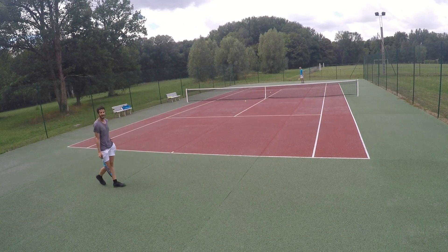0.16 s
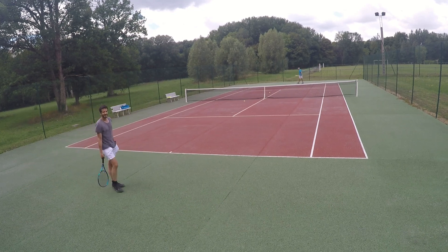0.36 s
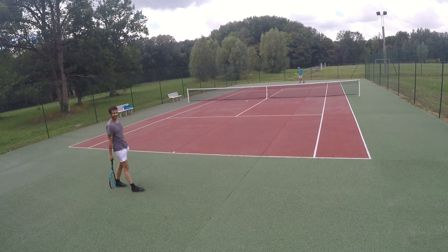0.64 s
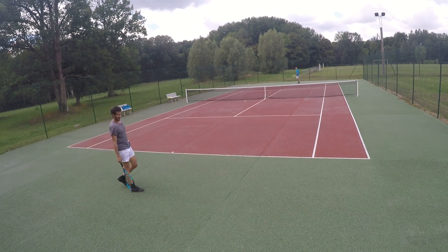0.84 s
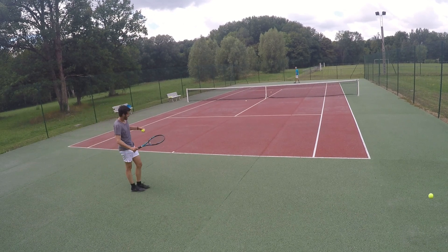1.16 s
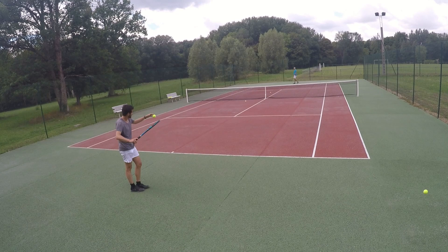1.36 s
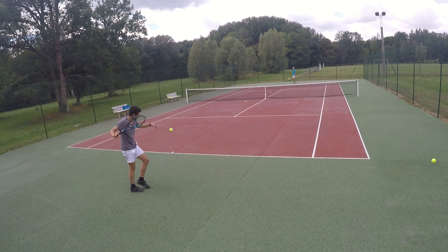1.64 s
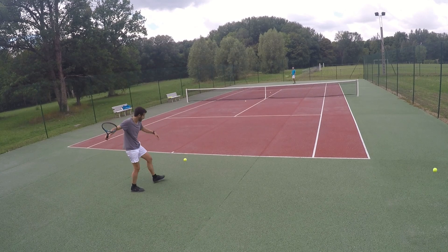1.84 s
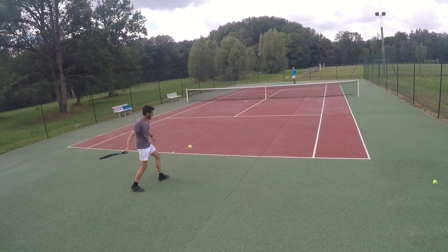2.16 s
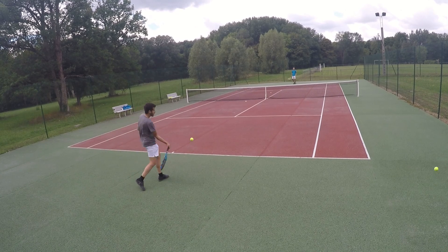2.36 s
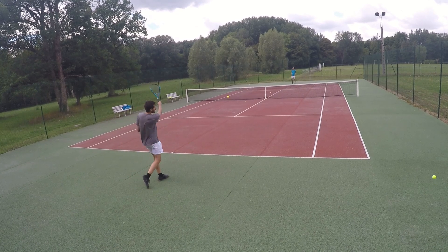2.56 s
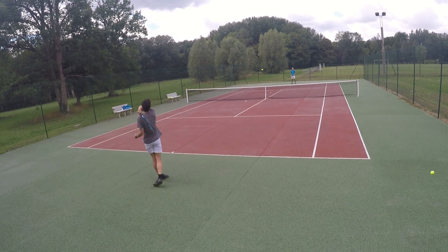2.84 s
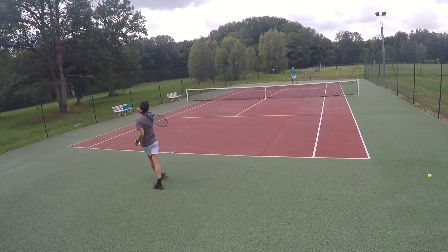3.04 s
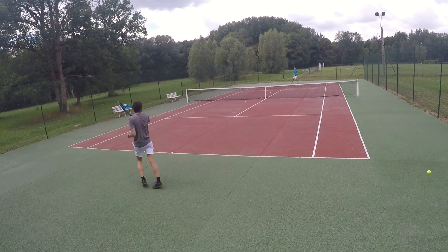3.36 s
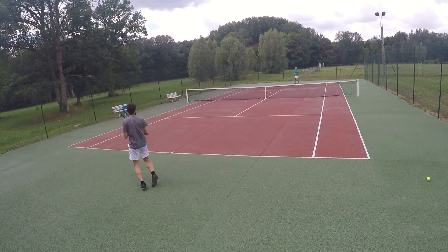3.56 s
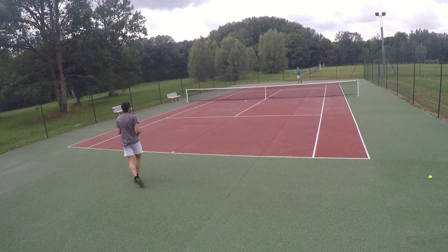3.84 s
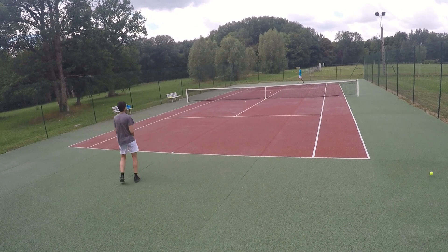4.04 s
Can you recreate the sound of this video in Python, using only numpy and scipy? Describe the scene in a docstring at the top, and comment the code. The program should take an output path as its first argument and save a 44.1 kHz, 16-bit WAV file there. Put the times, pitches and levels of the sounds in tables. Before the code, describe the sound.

Outdoors on a tennis court, a faint hiss and a short rough hum of stretching wire lead into a loud, clipped crash as a ball hits the chain-link fence holding the microphone. The mesh slaps the housing in quick, thinning knocks, links jingle and tick, and the panel sways in a deep rumble that fades away.

```python
"""On an outdoor court, a ball bangs into a chain-link fence right beside a camera that hangs on it.
The wires scuff and hum as the mesh stretches, then noise bursts make the crash, which overloads the microphone.
The mesh slaps the camera's housing in ever rarer knocks: short taps sent through the housing's filter.
Links jingle as random clinks and slip in runs of ticks, while filtered noise gives the panel's deep sway.
A racket meets a ball further off, a short burst of noise, and a soft hiss of air lies under it all."""
import sys
import numpy as np
from scipy import signal
from scipy.fft import rfft, irfft, next_fast_len
from scipy.io import wavfile
from scipy.ndimage import map_coordinates

SR = 44100
rng = np.random.default_rng(int(sys.argv[2]) if len(sys.argv) > 2 else 0)


def transcribe(signal):
    """Save signal, clipped to [-1, 1], as a 16-bit WAV file at the path in sys.argv[1]."""
    frames = np.atleast_2d(signal).T
    limited = np.clip(frames, -1, 1)
    pcm = np.round(limited * 32767).astype(np.int16)
    wavfile.write(sys.argv[1], SR, pcm)


N = 185352  # length in samples
CRASH_S = .39  # when the ball lands
TOP_HZ = 15850  # no sound above this

# the mesh slaps the housing: start_s, level_db, treble_db, cavity_ring_db, thud_db
KNOCKS = [(0.3908, -20, -1, 4, -26), (0.3968, -13, -10, 1, -20), (0.4072, -7.5, -0.5, 3.5, -14.5),
          (0.4184, -18, -6.5, 1, -14.5), (0.4298, -6, 3, -4, -28), (0.4385, -13, -3, -1, -32),
          (0.4495, -19, -7, -1, -17), (0.469, -14.5, -9, 0, -25), (0.479, -29, -16, -3, -29),
          (0.4878, -20.5, -3.5, 0, -19), (0.5091, -17, -8, 1, -21), (0.5601, -18.5, -7.5, -1.5, -25.5),
          (0.6023, -24.5, -24.5, 3, -35.5), (0.6223, -25.5, -25.5, 2, -31),
          (0.6506, -33, -22.5, -3.5, -35.5), (0.6763, -27.5, -15.5, -3, -38), (0.7001, -21, -7, 0.5, -31),
          (0.72, -35, -12.5, -2.5, -36.5), (0.732, -34, -21.5, 1, -33), (0.7921, -25, -15, 0, -33),
          (0.858, -38.5, -12, -2.5, -38.5), (0.9178, -26, -16.5, 5, -32), (0.9812, -25, -19, -1.5, -31),
          (1.064, -41, -5, -4.5, -37.5), (1.0855, -21, -17.5, 1, -32), (1.1266, -24.5, -20.5, 3, -31),
          (1.2104, -26, -21.5, 2, -33.5), (1.2888, -32, -26, 1.5, -40.5), (1.3594, -34.5, -28.5, 0.5, -44),
          (1.683, -49.5, -44, 0.5, -50.5), (1.7475, -42.5, -43, -0.5, -43),
          (1.7714, -39.5, -30.5, -3, -35.5)]
# links slip and settle, levels before the trims in slips(): start_s, housing_db, wire_db, thud_db
SLIPS = [(1.309, -42.5, -46, -47.5), (1.44, -47.5, -56.5, -50), (1.475, -47, -54.5, -42.5),
         (1.487, -37, -49, -39), (1.547, -42.5, -59.5, -50), (1.576, -35.5, -47, -38.5),
         (1.625, -41, -58, -46.5), (1.701, -39, -64.5, -38), (1.764, -51, -48, -31),
         (1.782, -53, -50, -37.5), (1.855, -51.5, -50, -50), (1.891, -35, -55.5, -39),
         (1.916, -45, -54.5, -48.5), (1.975, -43, -50, -52.5), (1.991, -57, -53, -57.5),
         (2.101, -43, -58.5, -42.5), (2.115, -36, -45, -40), (2.175, -33, -54.5, -32),
         (2.235, -47, -60, -42), (2.256, -40.5, -45.5, -48), (2.373, -29.5, -48, -31),
         (2.402, -42, -58, -37), (2.5704, -30, -50.5, -33.5), (2.591, -37.5, -59, -39.5),
         (2.679, -47, -68, -43.5), (2.715, -48.5, -66.5, -39), (2.797, -43, -62.5, -33.5),
         (2.933, -51, -69, -45), (3.258, -54, -69, -45), (3.364, -39.5, -64.5, -38),
         (3.595, -52, -66.5, -40), (4.079, -51.5, -72.5, -42.5)]
# the loudest plucks of single wires, before the trim in pings(): start_s, level_db
PINGS = [(0.4626, -24), (0.495, -41), (0.514, -34.5), (0.529, -52), (0.538, -48), (0.611, -53),
         (0.641, -52), (0.664, -50), (0.684, -42), (0.7427, -42.5), (0.776, -51), (0.805, -45.5),
         (0.879, -55.5), (0.9384, -56), (1.1036, -55), (1.118, -45.5), (1.3128, -63.5), (1.476, -60),
         (1.857, -62)]
# ways the camera's mount rocks: pitch_hz, level_db, t60_s (time to fall by 60 dB)
MOUNT_MODES = [(57.3, 13, 0.13), (97.4, 13.5, 0.098), (140, 7.5, 0.06), (301.4, -4, 0.099),
               (530, -5.5, 0.02)]
# the zing of short wire spans: pitch_hz, width_hz, level_db
ZING = [(3450, 260, -2), (4390, 300, 1), (5150, 180, -10.5), (5310, 410, -11), (6360, 140, -10),
        (6600, 320, -13)]
# how strongly the housing passes each pitch: pitch_hz, gain_db
HOUSING_GAIN = [(60, -21), (200, -23), (350, 0.5), (520, 4.5), (650, 4.5), (950, 1), (1130, 0), (1320, 1.5),
                (1520, 1), (1870, 5), (2700, -1), (4200, -2.5), (5500, -15.5), (7200, -23.5), (9000, -31),
                (12500, -36), (15000, -42.5)]
# the air space inside the housing: pitch_hz, width_hz, gain_db
CAVITY = (748, 74, 15)
# pitches that the housing cancels: pitch_hz, width_hz
NULLS = [(2530, 20), (3060, 180), (3830, 170), (4570, 170), (5350, 63), (6520, 160)]
# wires that scuff on each other as the mesh stretches: pitch_hz, width_hz, level_db
SCUFF = [(670, 30, -2), (1244, 81, 1), (1390, 30, -3), (1630, 35, 0), (1900, 90, -12.5), (2420, 70, -13)]
# tone of the panel's swing: pitch_hz, relative_level_db
DEEP = [(10, -2.5), (20, 2), (32, -5), (45, -12), (62, -19.5), (90, -22.5), (160, -45), (300, -85)]
# tone of the droning wires: pitch_hz, relative_level_db
DRONE = [(50, -22), (90, -4.5), (140, 0), (190, -4), (240, -15), (290, -16), (380, -29), (700, -52),
         (1500, -80)]
# tone of the air's hiss: pitch_hz, relative_level_db
HISS = [(100, 6), (400, 10), (1000, 0.5), (2500, -3), (6000, -6.5), (9000, -11), (14000, -15),
        (16000, -24.5)]
# how long the wires ring on after a knock: pitch_hz, t60_s
WIRE_TAIL = [(200, 0.24), (800, 0.48), (2200, 1), (4000, 0.62), (12000, 0.099)]
# jingle set off by the crash, a quick part and a lingering one: level_db, fall_db_per_s
CHATTER_FADE = [(-34, 59.5), (-42, 17.5)]
# drone set off by the crash, a quick part and a lingering one: level_db, fall_db_per_s
DRONE_FADE = [(-28.5, 67), (-42.5, 33)]
# what a slipping link rings with: pitch_hz, width_hz, level_db
WIRES = [(1278, 188, 0.5), (1663, 89, 1.5), (1856, 196, 4), (2470, 230, -6), (3384, 160, -22)]
# low modes that the whole panel booms with: pitch_hz, level_db, t60_s
PANEL_MODES = [(46.5, -9.5, 0.54), (98.5, -12, 0.45), (188.6, -16, 0.35)]
# how far the panel swings: time_s, level_db
SWING = [(0, -39.5), (.27, -39), (.38, -34), (.41, -12), (.5, -21.5), (.55, -37), (.6, -19.5), (.75, -32),
         (.95, -22.5), (1.08, -20), (1.3, -24), (1.7, -21), (2.05, -25), (2.22, -19), (2.68, -19),
         (2.76, -26.5), (2.84, -17), (2.9, -25), (3.15, -28.5), (3.43, -23.5), (3.55, -29.5), (4.2, -31)]
# what a slip shakes in the mount and the housing: pitch_hz, width_hz, level_db
THUD = [(86.2, 17.4, 4.5), (138.3, 26.4, 1), (196, 44, -17.5), (273, 36.8, -12.5), (747, 20, -16.5)]
# the hum of the stretching mesh: pitch_hz, width_hz, level_db
GROAN = [(118, 35, 0), (162, 40, 0), (208, 40, -3), (265, 25, -13)]
# bright jingle of the short spans, quick and lingering: level_db, fall_db_per_s
ZING_FADE = [(-44, 66), (-64.5, 25)]
# one span of wire sounds under the ball: start_s, pitch_hz, level_db, t60_s
TWANG = (0.4008, 2800, -9, 0.016)


def amp(db):
    """Turn decibels into a gain."""
    return 10 ** (np.asarray(db) / 20)


def unit(x):
    """Scale x to an rms of 1."""
    return x / np.sqrt(np.mean(x ** 2) + 1e-20)


def seconds(fraction):
    """Sample times of a sound that lasts 1/fraction of a second."""
    return np.arange(SR // fraction) / SR


def along(points, hz):
    """Read a curve of (pitch, value) points, spaced by the logarithm of pitch as we hear it."""
    pitch, value = np.transpose(points)
    return np.interp(np.log(hz + 1), np.log(pitch + 1), value)


def add(track, start_s, x):
    """Mix x into the track at a given time."""
    i = round(start_s * SR)
    track[i:i + len(x)] += x[:N - i]


def coloured(x, gain, size=16384):
    """Filter x to this gain at each pitch; the filter never sounds ahead of its input."""
    cepstrum = irfft(np.log(np.maximum(gain(np.fft.rfftfreq(size, 1 / SR)), 1e-6)))
    # folding the cepstrum puts the filter's energy as early as possible
    cepstrum[1:size // 2] *= 2
    cepstrum[size // 2 + 1:] = 0
    response = irfft(np.exp(rfft(cepstrum)))
    return signal.fftconvolve(x, response)[:len(x)]


def noise(gain, count=N):
    """Coloured noise at rms 1; the filter's first quarter second is thrown away."""
    return unit(coloured(rng.standard_normal(count + SR // 4), gain)[SR // 4:])


def band(x, lo_hz, hi_hz):
    """Keep the part of x between two pitches."""
    edges = [lo_hz, min(hi_hz, SR / 2 - 1)]
    return signal.sosfilt(signal.butter(3, edges, "band", fs=SR, output="sos"), x)


def resonances(table, hz):
    """Gain of several resonances added up: each peaks at its pitch and falls away on both sides."""
    return sum(amp(db) / (1 + (2 * (hz - pitch) / width) ** 2) for pitch, width, db in table)


def wobble(rate):
    """A smooth random curve with this many random points a second."""
    points = rng.standard_normal(int(N * rate / SR) + 4)
    return map_coordinates(points, [np.arange(N) * rate / SR])


def ticks(rate, spread_db, count=N):
    """Random contacts of uneven strength, about this many a second."""
    sizes = amp(spread_db * np.minimum(rng.exponential(size=count), 3))
    return (rng.random(count) < rate / SR) * rng.choice([-1, 1], count) * sizes


def since_crash():
    """Seconds since the crash, and a gate that opens over 10 ms from then on."""
    t = np.arange(N) / SR - CRASH_S
    return np.maximum(t, 0), np.clip(t / .01, 0, 1)


def fading(parts):
    """Gain that jumps up at the crash and dies away, each part at its own speed."""
    age, struck = since_crash()
    return struck * sum(amp(db - db_per_s * age) for db, db_per_s in parts)


def stirred(events, t60, attack):
    """Gain that swells up at each (start, level, ...) event and dies away after it."""
    kicks = np.zeros(N)
    for start_s, db, *_ in events:
        kicks[round(start_s * SR)] += amp(db)
    keep = np.exp(-1 / (attack * SR))
    swell = signal.lfilter([1 - keep], [1, -keep], kicks)
    return signal.lfilter([1], [1, -amp(-60 / (t60 * SR))], swell)


def reach():
    """How far the panel swings: barely at rest, widely after the crash, then unevenly less."""
    time_s, level_db = np.transpose(SWING)
    return amp(np.interp(np.arange(N) / SR, time_s, level_db))


def cavity(hz):
    """Air shut inside the housing resonates around one pitch."""
    centre, width, db = CAVITY
    return amp(db) * hz * width / np.hypot(centre ** 2 - hz ** 2, hz * width)


def housing(hz, cavity_db=0):
    """Gain from the fence to the microphone: the shell passes, the cavity boosts, nulls cancel."""
    nulls = np.prod([np.hypot(hz - pitch, width / 8) / np.hypot(hz - pitch, width)
                     for pitch, width in NULLS], axis=0)
    return amp(along(HOUSING_GAIN, hz)) * np.hypot(1, amp(cavity_db) * cavity(hz)) * nulls


def air(db=-62.5, back_s=2.235, return_db_per_s=12.0):
    """A soft hiss of noise that sinks away at the crash and creeps back at a steady rate."""
    age, struck = since_crash()
    dip_db = struck * return_db_per_s * np.maximum(back_s - age, 0)
    return amp(db - dip_db) * noise(lambda hz: amp(along(HISS, hz)))


def sway(drone_rest_db=-55.0, drone_db=-35.5, hum_rest_db=-86.5, hum_db=-45, jolt_db=8, jolt_t60=0.49,
         swell_db=6.0, hum_width_hz=26, line_db=-2):
    """The swinging panel rumbles, keeps the cavity humming and, jolted by slips, the wires droning."""
    swing = signal.hilbert(noise(lambda hz: amp(along(DEEP, hz))))
    # even out the size from swing to swing
    swing = unit(band(swing.real / np.hypot(np.abs(swing), 1), 10, 83))
    jolts = amp(jolt_db) * stirred(SLIPS, jolt_t60, attack=0.011)
    motion = (reach() + jolts) * amp(swell_db * wobble(14))
    drone_gain = amp(drone_rest_db) + fading(DRONE_FADE) + amp(drone_db) * motion
    drone = drone_gain * noise(lambda hz: amp(along(DRONE, hz)))
    hum_gain = (amp(hum_rest_db) + amp(hum_db) * reach()) * unit(amp(5 * wobble(18)))
    hollow = noise(lambda hz: cavity(hz) / np.hypot(1, (hz / 1300) ** 2))
    line = noise(lambda hz: resonances([(CAVITY[0], hum_width_hz, 0)], hz))
    hum = hum_gain * unit(hollow + amp(line_db) * line)
    return reach() * swing + drone + hum


def stretch(start_s=.285, hum_db=-25.0, hum_t60=1.6, hum_attack=0.0059, release_t60=.15,
            scuff_db=-49, scuff_t60=0.33, rub_db=-48, rub_t60=0.12):
    """The ball presses the slack mesh taut: wires scuff and hum roughly; the hum dies faster after the crash."""
    out, t = np.zeros(N), seconds(3)
    groan = signal.hilbert(noise(lambda hz: resonances(GROAN, hz), count=len(t)))
    groan = unit(band(groan.real / np.hypot(np.abs(groan), 2), 70, 290))  # its peaks are rounded off
    release_db = 60 * np.maximum(start_s + t - CRASH_S, 0) / release_t60
    hum = groan * amp(hum_db - 60 * t / hum_t60 - release_db) * (1 - np.exp(-t / hum_attack)) ** 2
    scuff = noise(lambda hz: resonances(SCUFF, hz), count=len(t)) * amp(scuff_db - 60 * t / scuff_t60)
    rub = unit(band(rng.standard_normal(len(t)), 1400, 2140)) * amp(rub_db - 60 * t / rub_t60)
    add(out, start_s, hum + (scuff + rub) * (1 - np.exp(-t / .002)))
    return out


def crash(level_db=-7.0, bright_db=-13.5, boom_db=-0.48, boom_t60=0.2):
    """The ball lands: links around it clash in a dense burst of contacts, and the panel booms."""
    out, t = np.zeros(N), seconds(2)

    def clash():
        return ticks(5000, 3, count=len(t))

    def body_gain(hz):
        return housing(hz) / np.hypot(1, cavity(hz)) / np.hypot(1, (hz / 7000) ** 2)

    body = unit(coloured(clash(), body_gain))
    edge = unit(coloured(clash(), lambda hz: housing(hz) * np.minimum(hz / 7000, 1) ** 2))
    burst = body * amp(-60 * t / .11) + edge * amp(bright_db - 60 * t / .05)
    boom = unit(band(clash(), 86, 340)) * amp(boom_db - 60 * t / boom_t60) * (1 - np.exp(-t / 0.002))
    add(out, CRASH_S, amp(level_db) * (burst + boom))
    return out


def panel(attack=0.0038):
    """The struck panel rings briefly in its lowest modes, each a fading sine."""
    out, t = np.zeros(N), seconds(2)
    ring = sum(amp(db - 60 * t / t60) * np.sin(2 * np.pi * (hz * t + rng.random()))
               for hz, db, t60 in PANEL_MODES)
    add(out, CRASH_S, ring * (1 - np.exp(-t / attack)))
    return out


def clinks(rate, spread_db, t60, lo_hz, hi_hz):
    """Random contacts of uneven strength; each rings a link at two pitches for around t60 seconds."""
    out, t = np.zeros(N), seconds(24)
    for when, size, life, *pitches in rng.random((int(rate * N / SR), 5)):
        ring = sum(np.sin(2 * np.pi * (lo_hz + p * (hi_hz - lo_hz)) * t) for p in pitches)
        size_db = spread_db * min(-np.log(1 - size), 3)  # mostly small, a few big
        add(out, when * (N - 1) / SR, amp(size_db - 60 * t / (t60 * (.5 + life))) * ring)
    return out


def chatter(link_t60=0.032, wire_hz=2750, swing_db=-55, stir_db=-22, stir_t60=0.17,
            stir_by_treble=0.82, zing_stir_db=-13, zing_t60=.014, zing_ring_db=-2):
    """Links jingle in flurries, stirred by crash, slaps and swing; the bright zing dies out first."""
    # loud, bright slaps stir the most
    slap_force = [(start_s, db + stir_by_treble * treble_db) for start_s, db, treble_db, *_ in KNOCKS]
    stir = amp(stir_db) * stirred(slap_force, stir_t60, attack=0.0024)

    def flurry():
        return unit(amp(3.8 * wobble(40)))

    def dull_gain(hz):
        return housing(hz) / np.hypot(1, cavity(hz) / 2) / np.hypot(1, (hz / wire_hz) ** 7)

    def zing_gain(hz):
        return housing(hz) * hz / wire_hz + amp(zing_ring_db) * resonances(ZING, hz)

    long_spans = clinks(800, 4, link_t60, 250, 3300) * flurry()
    short_spans = clinks(450, 4, zing_t60, 3100, 7600) * flurry()
    dull = unit(coloured(long_spans, dull_gain))
    zing = unit(coloured(short_spans, zing_gain))
    dull_level = fading(CHATTER_FADE) + stir + amp(swing_db) * reach()
    zing_level = fading(ZING_FADE) + amp(zing_stir_db) * stir
    return dull_level * dull + zing_level * zing


def dispersed(x):
    """Stiff wire carries treble faster than bass, which spreads a tap over a fraction of a millisecond."""
    allpass = [1, -1.5, .6]
    return signal.lfilter(allpass[::-1], allpass, x)


def knocks(base_hz=3700, treble_per_octave_db=7.0, graze_db=-18.52, graze_t60=.013):
    """Each slap taps the housing, as bright or dull as its treble level says; the wire grazes on briefly."""
    out, t = np.zeros(N), seconds(4)
    for start_s, db, treble_db, cavity_db, _ in KNOCKS:
        corner_hz = base_hz * 2 ** ((treble_db + 18.5) / treble_per_octave_db)
        graze = band(rng.standard_normal(len(t)), 950, 16000)
        force = (t == 0) + amp(graze_db - 60 * t / graze_t60) * graze
        tap = coloured(dispersed(force),
                       lambda hz: housing(hz, cavity_db) / np.sqrt(1 + (hz / corner_hz) ** 4))
        tap /= np.std(band(tap, 500, 2500)[:SR // 170])  # same mid-range strength for every tap
        add(out, start_s, amp(db) * tap)
    return out


def ringing(x):
    """Every knock runs along the wires and comes back as a diffuse tail of fading noise."""
    hz, t, spectrum = signal.stft(rng.standard_normal(SR), SR, nperseg=256)
    fade = amp(-60 * t / along(WIRE_TAIL, hz)[:, None])
    tail = signal.istft(spectrum * fade, SR, nperseg=256)[1]
    return signal.fftconvolve(x, tail / np.linalg.norm(tail))[:N]


def thuds(attack=.0015):
    """Every slap also rocks the mount: short, dry sines whose pitches shift a little each time."""
    out, t = np.zeros(N), seconds(4)
    for start_s, *_, db in KNOCKS:
        rock = sum(amp(level - 60 * t / t60) * np.sin(2 * np.pi * hz * np.exp(0.089 * rng.normal()) * t)
                   for hz, level, t60 in MOUNT_MODES)
        add(out, start_s, amp(db) * (1 - np.exp(-t / attack)) * rock)
    return out


def twang():
    """Under the ball one span of wire gives a short, clear note, a fading sine."""
    out, t = np.zeros(N), seconds(16)
    start_s, hz, db, t60 = TWANG
    add(out, start_s, amp(db - 60 * t / t60) * (1 - np.exp(-t / .001)) * np.sin(2 * np.pi * hz * t))
    return out


def pings(trim_db=-0.5, t60=0.023, attack=0.00037):
    """A short span of wire is plucked with a tick, and rings with a new mix of pitches each time."""
    out, t = np.zeros(N), seconds(8)
    for start_s, db in PINGS:
        ring = sum(amp(level + 4.4 * rng.normal())
                   * np.sin(2 * np.pi * (hz + width * rng.normal() / 2) * t) for hz, width, level in ZING)
        ring = amp(-60 * t / t60) * (1 - np.exp(-t / attack)) * unit(ring)
        tick = unit(band(rng.standard_normal(len(t)), 3500, 7500)) * amp(-60 * t / .007)
        add(out, start_s, amp(db + trim_db) * (ring + tick))
    return out


def slips(attack=0.0012, t60=0.075, tail_db=-14, tail_t60=0.24, body_trim_db=-8.5, wire_trim_db=2.5,
          thud_trim_db=3.0, thud_t60=0.14, shake_hz=1300, zing_db=-22.0, catch_db=6,
          dull_db=20, dull_attack=.003):
    """A link lets go with a clack, or softly if the wire barely rings; ragged ticks shake and ring it."""
    out, t = np.zeros(N), seconds(4)

    def run(gain):
        """A run of ticks through a filter, taken once the filter is sounding."""
        return unit(coloured(ticks(1400, 2, count=2 * len(t)), gain)[len(t):])

    for start_s, body_db, wire_db, low_db in SLIPS:
        softness = np.clip((body_db - wire_db - dull_db) / 6, 0, 1)
        rise = 1 - np.exp(-t / (attack + softness * dull_attack))
        # softer slips rise and fall more slowly
        envelope = rise * (amp(-60 * t / (t60 * (1 + softness))) + amp(tail_db - 60 * t / tail_t60))
        scrape = run(lambda hz: housing(hz, cavity_db=-4.5))
        catch = band(coloured(1. * (t == 0), housing), 253, 2100)  # the single clack at the start
        shake = unit(band(scrape, 253, shake_hz)) + amp(catch_db) * catch / np.abs(catch).max()
        zing = amp(zing_db) * envelope * unit(band(scrape, 2880, 7250))
        ring = run(lambda hz: resonances(WIRES, hz)) + zing
        thud = run(lambda hz: resonances(THUD, hz)) * rise * amp(low_db + thud_trim_db - 60 * t / thud_t60)
        link = amp(body_db + body_trim_db) * shake + amp(wire_db + wire_trim_db) * ring
        add(out, start_s, envelope * link + thud)
    return out


def racket():
    """A faint, thin smack of strings from the court: a short burst of band-limited noise."""
    out, t = np.zeros(N), seconds(8)
    envelope = amp(-49 - 60 * t / .05) * (1 - np.exp(-t / .003))
    add(out, 2.492, envelope * unit(band(rng.standard_normal(len(t)), 1900, 4600)))
    return out


def scene(ring_db=-22):
    """The fence is heard through the camera's own body, the court through the air."""
    slaps = knocks()
    fence = sway() + stretch() + crash() + panel() + chatter()
    fence += slaps + amp(ring_db) * ringing(slaps) + thuds()
    fence += twang() + pings() + slips()
    return (air() + fence + racket())[None]


def record(dry):
    """The overloaded microphone flattens peaks just under full scale; pitches above TOP_HZ are cut."""
    clipped = dry / (1 + np.abs(dry / .96) ** 8) ** (1 / 8)
    size = next_fast_len(N + SR // 2)
    return irfft(rfft(clipped, size) * (np.fft.rfftfreq(size, 1 / SR) < TOP_HZ), size)[..., :N]


dry = scene()
out = record(dry)
transcribe(out)
```